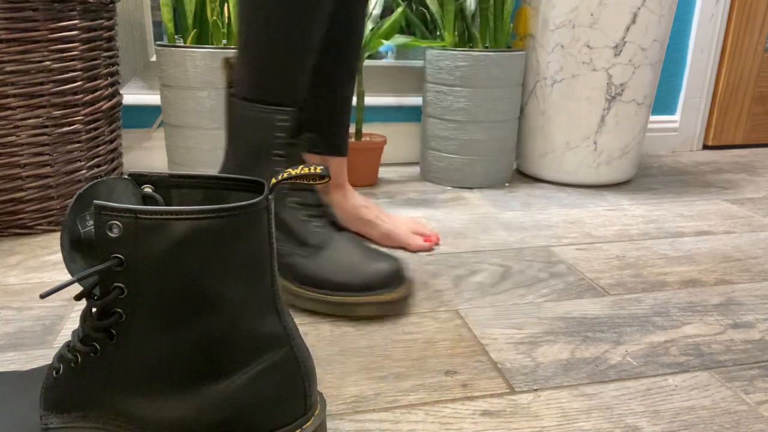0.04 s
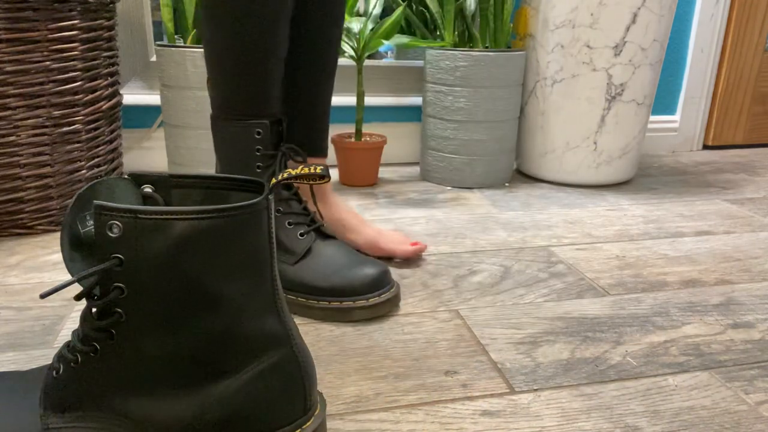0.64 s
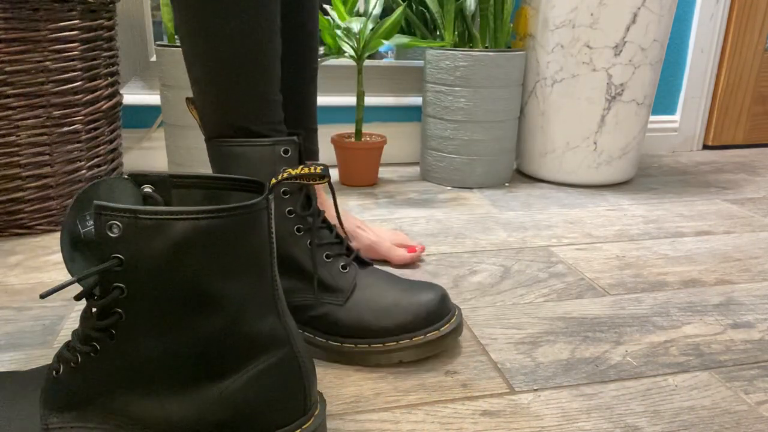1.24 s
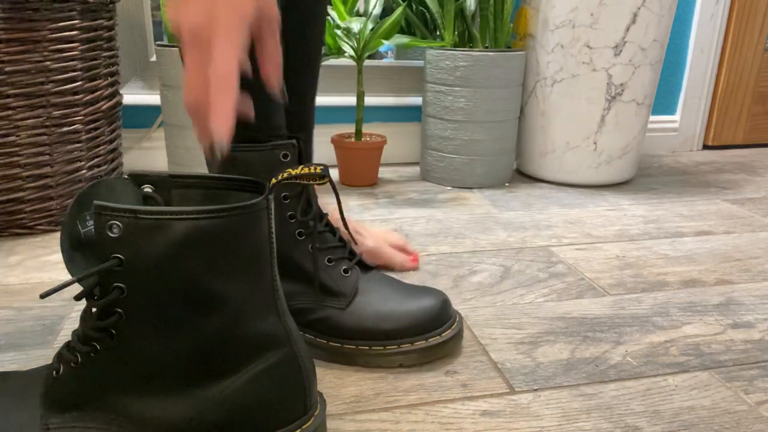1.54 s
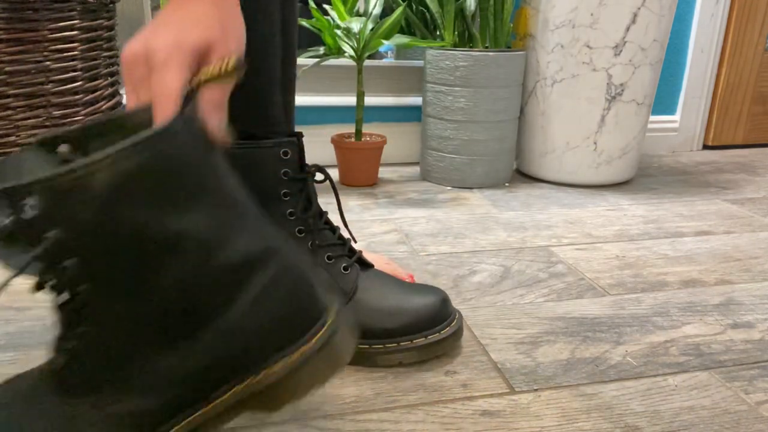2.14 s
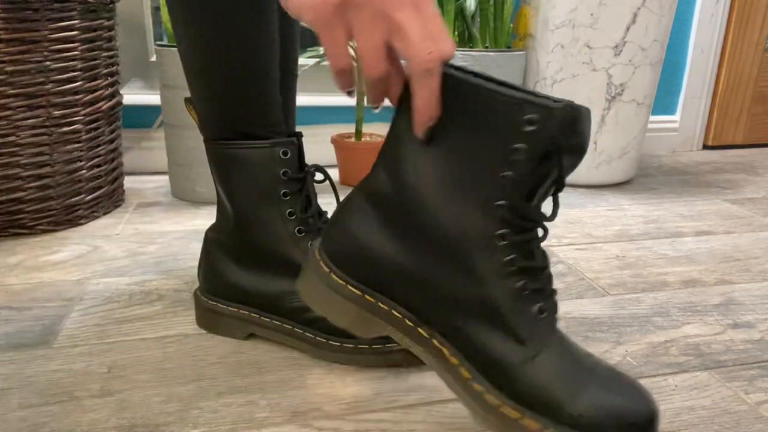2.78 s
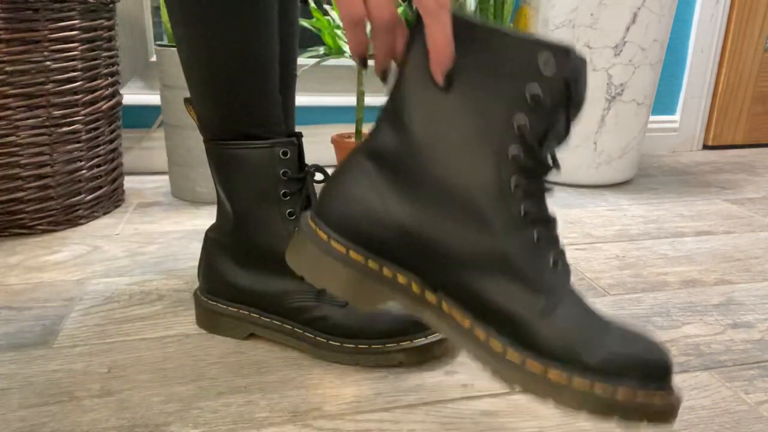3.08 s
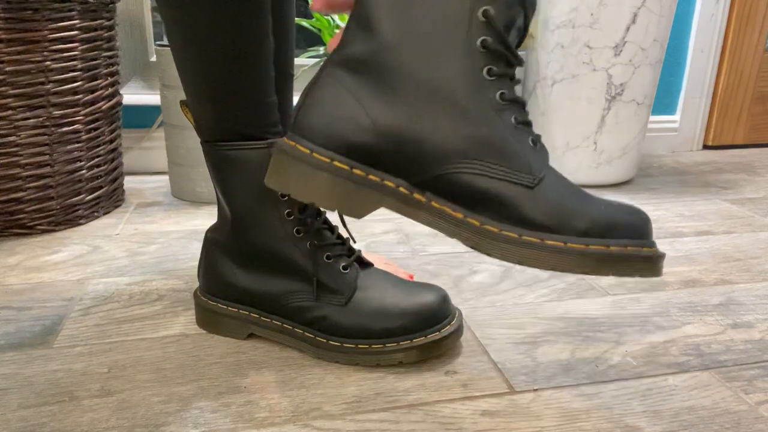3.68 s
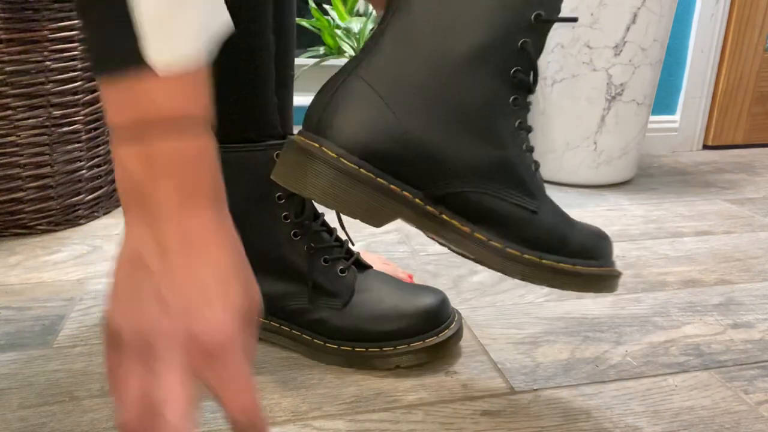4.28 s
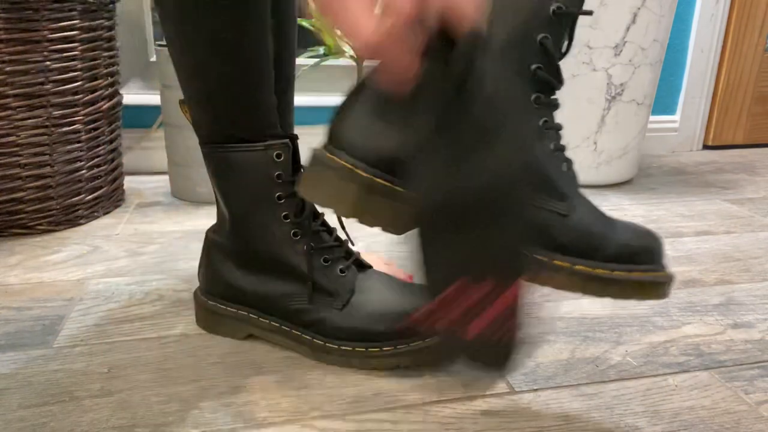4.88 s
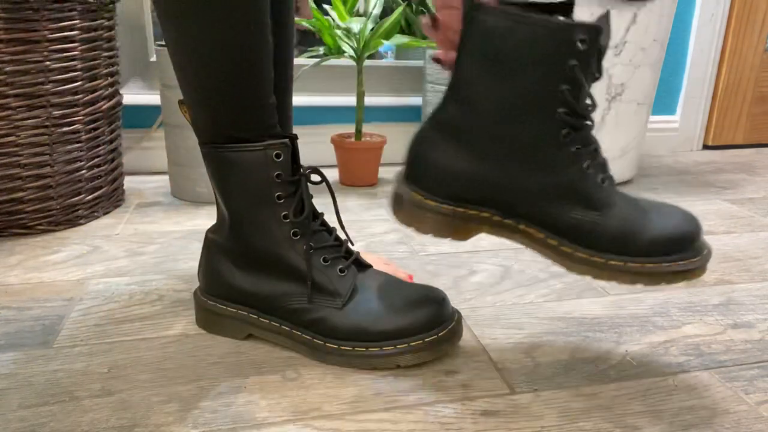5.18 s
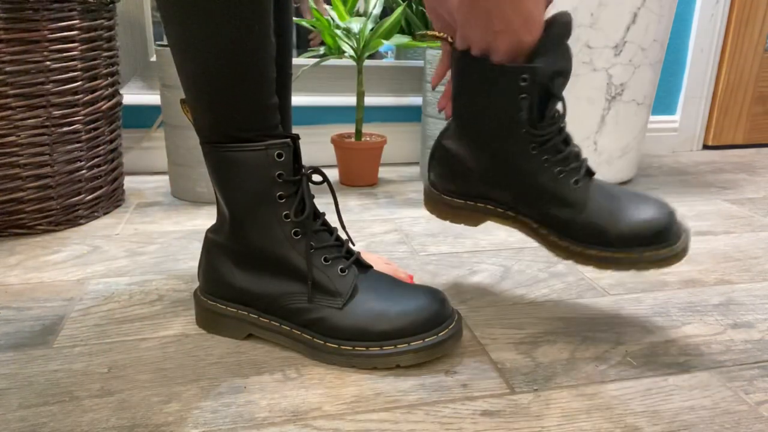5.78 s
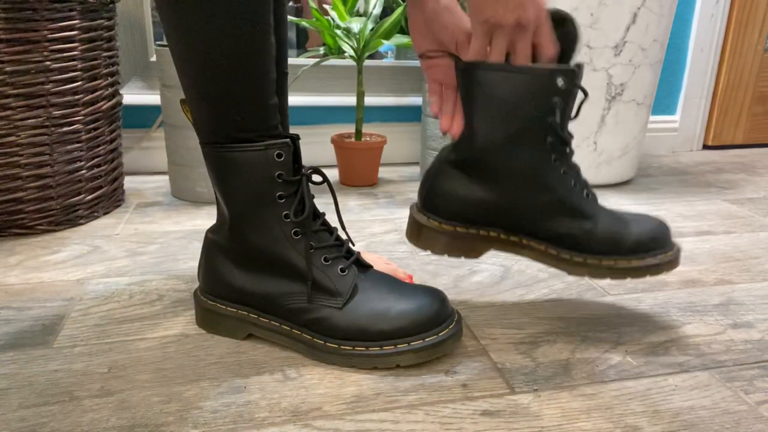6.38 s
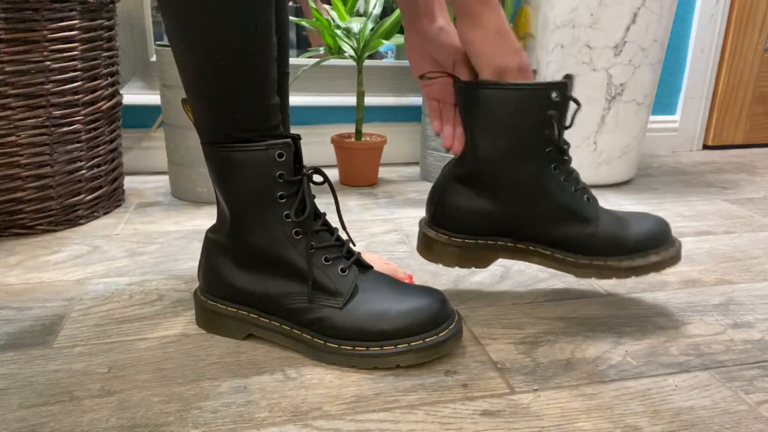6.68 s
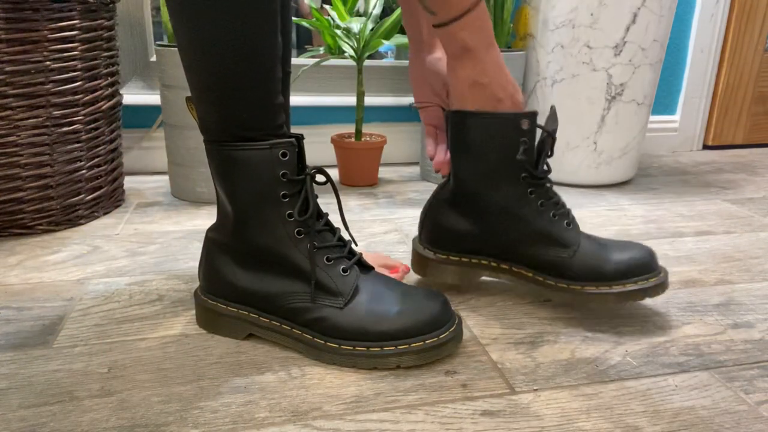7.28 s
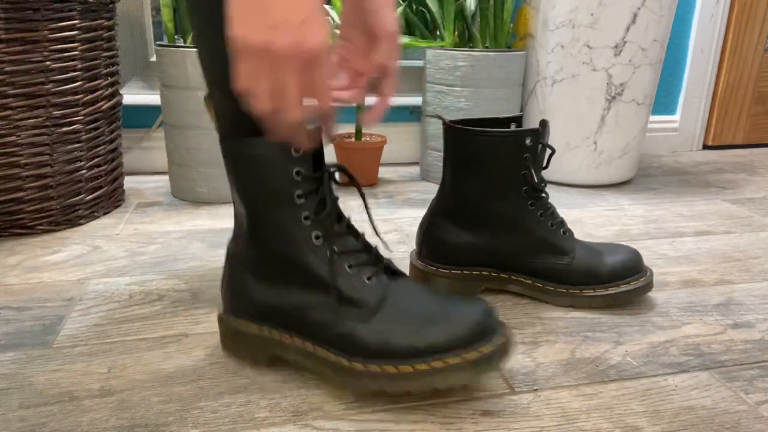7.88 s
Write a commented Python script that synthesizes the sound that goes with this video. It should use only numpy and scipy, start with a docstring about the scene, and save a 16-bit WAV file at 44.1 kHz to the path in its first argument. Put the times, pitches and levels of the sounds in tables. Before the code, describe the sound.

Stiff leather boots thump and scuff on a hard floor, creaking and rubbing as they are handled, with cloth swishes over a low room hum.

```python
"""Two stiff leather boots on a hard floor in a small room, close to a stereo pair of microphones.
First one boot is stepped into place: its rubber sole thumps and scuffs. Then a hand grips its mate and
swings it round; the shaft creaks, a sleeve passes, fingers pull the tongue open. Near the end the boot
is set down with a thump and the hand slides out. Throughout, cloth swishes and leather rubs as fast as
each movement goes, folds snap and lace tips tick, while the room rumbles and hums behind."""
import sys
import numpy as np
from scipy import signal
from scipy.fft import rfft, irfft, next_fast_len
from scipy.io import wavfile
from scipy.ndimage import uniform_filter1d, map_coordinates

SR = 44100
rng = np.random.default_rng(int(sys.argv[2]) if len(sys.argv) > 2 else 0)


def unload_audio(sound):
    """Save the sound as a 16-bit wav file, at the path given as the first command line argument."""
    columns = np.transpose(np.atleast_2d(sound))
    # keep every value between -1 and 1, then stretch to whole-number steps
    steps = np.round(np.clip(columns, -1, 1) * 32767)
    wavfile.write(sys.argv[1], SR, steps.astype(np.int16))


N = 349713
TIME = np.arange(N) / SR
BRIEF = TIME[:SR // 4]   # time within one short event

# sole meets floor: t/s, boot ring/dB, bending wave/dB, floor thud/dB, slap/dB, slap f/Hz, wave sweep/Hz
STEPS = [(0.118, -57, -32.5, -55, -56.5, 2530, 845), (0.1788, -51, -37.5, -33.5, -48.5, 895, 1000),
         (7.379, -27.5, -39.5, -37, -53.5, 1460, 770)]
# modes of the boot struck on its sole: f/Hz, level/dB, t60/s
BOOT_MODES = [(161, 7.5, 0.024), (222.5, 7.5, 0.026), (326, 8.5, 0.025), (568, -11.5, 0.054),
              (830, -52, 0.014)]
# the sole catches on the floor: t/s, level/dB
SCUFFS = [(0.1185, -54.5), (0.178, -63), (0.199, -57), (0.2145, -57.5), (1.107, -64), (1.1218, -47),
          (1.127, -62), (1.135, -66), (1.1402, -57), (1.143, -52), (1.1525, -55), (1.158, -64),
          (1.1712, -49.5), (1.179, -62), (1.184, -68), (1.193, -64), (1.206, -62), (1.2175, -63)]
# resonances of rubber on the hard floor: f/Hz, width/Hz, level/dB
SOLE_RING = [(1260, 280, 6), (2520, 540, -1.5), (4300, 990, -14.5)]
# movements of foot or hand: fastest t/s, rise/s, fall/s, cloth/dB, leather/dB, rasp/dB
STROKES = [ (0.0, .03, 0.038, -88, -72, -101), (0.13, 0.018, 0.035, -72.5, -68, -71),
           (0.2, 0.072, 0.14, -74.5, -72.5, -70), (0.38, 0.071, 0.16, -78, -90, -80),
           (0.801, 0.25, 0.11, -66, -74.5, -72), (0.95, 0.23, 0.068, -82, -76, -77.5),
           (1.019, 0.038, 0.074, -64.5, -72.5, -68.5), (1.147, 0.048, 0.12, -83, -64.5, -72),
           (1.39, 0.18, 0.046, -80.5, -94, -90), (1.48, 0.086, 0.18, -65, -78.5, -75),
           (1.681, 0.12, 0.24, -68, -76.5, -74.5), (2.07, 0.17, 0.15, -75, -77, -80.5),
           (2.452, 0.095, 0.11, -71, -67.5, -71.5), (2.606, 0.12, 0.06, -64, -71, -72.5),
           (3.1, 0.27, 0.23, -81.5, -94, -87.5), (3.3, 0.41, 1, -99, -82.5, -87),
           (3.585, 0.043, 0.08, -75, -71, -82), (3.63, 0.06, 0.1, -65.5, -73, -75),
           (3.72, 0.1, 0.16, -64.5, -64.5, -72.5), (3.9, 0.078, 0.12, -64.5, -68, -75),
           (4.23, 0.22, 0.1, -84, -100, -102), (4.43, 0.035, 0.12, -75, -81, -82.5),
           (4.65, 0.11, 0.14, -80, -99, -89), (4.77, 0.034, 0.088, -72, -104, -106),
           (5.24, 0.054, 0.13, -73, -79, -81.5), (5.36, 0.15, 0.19, -74.5, -75, -87),
           (5.64, 0.16, 0.21, -81, -79, -81.5), (5.82, 0.073, 0.11, -78, -74.5, -82.5),
           (5.985, 0.086, 0.091, -67.5, -67.5, -70), (6.045, 0.084, 0.091, -67.5, -67, -77),
           (6.12, 0.074, 0.082, -69, -69, -74.5), (6.34, 0.099, 0.17, -69.5, -72, -82),
           (6.51, 0.081, 0.084, -74, -73, -85), (6.61, 0.044, 0.077, -70.5, -72, -79),
           (6.72, 0.095, 0.12, -68.5, -72, -72.5), (6.82, 0.093, 0.081, -69.5, -73, -76),
           (6.9, 0.043, 0.06, -76, -80, -68), (6.98, 0.14, 0.2, -71.5, -73, -77.5),
           (7.095, 0.029, 0.05, -66.5, -67, -69), (7.31, 0.15, 0.072, -72, -74.5, -75),
           (7.384, 0.028, 0.049, -64.5, -64.5, -78), (7.56, 0.053, 0.068, -71.5, -74.5, -75),
           (7.66, 0.043, 0.15, -73.5, -72.5, -78.5), (7.77, 0.055, 0.036, -65.5, -68, -78),
           (7.83, 0.05, 0.06, -70.5, -77, -78.5), (7.915, 0.036, .1, -63, -60.5, -60)]
# low resonances of the leather upper: f/Hz, width/Hz, level/dB
LEATHER_BODY = [(810, 690, -2.5), (1394, 260, 5.5), (1920, 240, -9)]
# its high, rasping resonances: f/Hz, width/Hz, level/dB
LEATHER_RASP = [(2194, 360, 2), (3150, 280, 1.5), (3610, 610, -4), (4660, 1750, -8.5)]
# spectrum of sliding cloth: f/Hz, level/dB
CLOTH_SPECTRUM = [(500, 11), (1500, -18.5), (3000, -6.5), (4500, -6), (6000, -2.5), (8000, -2.5),
                  (10300, -1.5), (12500, -3.5), (15500, -7)]
# a hand or foot drags along the lining: fastest t/s, rise/s, fall/s, level/dB, f/Hz
DRAGS = [(0.18, 0.074, 0.1, -53.5, 463), (1.165, 0.075, 0.075, -59, 704), (1.7, 0.08, 0.47, -68.5, 490),
         (2.08, 0.099, 0.13, -62, 450), (2.5, 0.097, 0.1, -76, 413), (3.17, 0.085, 0.22, -71.5, 760),
         (3.72, 0.13, 0.12, -64, 850), (3.73, 0.095, 0.05, -57.5, 382), (5.33, 0.032, 0.47, -66.5, 420),
         (5.83, 0.039, 0.041, -59, 370), (5.97, 0.067, 0.42, -60, 376), (6.04, 0.11, 0.091, -79, 786),
         (6.72, 0.064, 0.065, -51.5, 476), (6.86, 0.22, 0.26, -64.5, 400), (7.11, 0.024, 0.066, -58, 430),
         (7.40, 0.13, 0.064, -56.5, 364), (7.57, 0.075, 0.27, -63.5, 443), (7.79, 0.17, 0.099, -67.5, 580),
         (7.92, 0.056, 0.11, -56, 560)]
# resonances of the air inside the shaft: f/Hz, width/Hz, level/dB
SHAFT_AIR = [(292, 59, 12.5), (457, 235, 3.5), (560, 51, 3), (815, 300, -20)]
# soft bumps of boot and hand: t/s, level/dB, f/Hz
BUMPS = [(0.131, -47, 600), (1.154, -56, 700), (1.483, -60, 720), (1.898, -52.5, 340), (1.910, -47, 343),
         (2.488, -51.5, 635), (3.894, -56, 560), (3.939, -58, 750), (5.542, -39.5, 140.3),
         (5.957, -52.5, 302), (6.617, -47, 320), (7.013, -52, 372), (7.091, -53, 338), (7.374, -49, 666),
         (7.443, -56, 510)]
# leather sticks and lets go with a snap: t/s, level/dB, f/Hz, width/Hz
SNAPS = [(0.132, -71, 2960, 800), (0.765, -60, 2200, 900), (1.481, -55.5, 1230, 1200),
         (1.65, -63.5, 965, 700), (1.895, -54.5, 3370, 800), (1.896, -60.5, 1300, 700),
         (2.486, -67, 1211, 894), (3.2359, -61, 1000, 590), (3.568, -63.5, 1400, 324),
         (3.899, -60, 2100, 1500), (3.91, -65, 1400, 1000), (3.94, -55, 1130, 600),
         (4.002, -60.5, 2100, 800), (5.067, -70, 1500, 700), (5.219, -62, 1200, 400),
         (5.621, -57.5, 1500, 604), (5.973, -59, 744, 295), (6.345, -65, 1430, 600),
         (6.471, -63, 1990, 1300), (7.011, -67, 1300, 706), (7.11, -58.5, 1120, 200),
         (7.473, -68, 1590, 400), (7.637, -62, 1290, 600)]
# slips of the bent shaft: t/s, level/dB
SHAFT_SLIPS = [(3.6875, -61), (3.692, -57), (3.6947, -46.5), (3.7025, -65), (3.707, -64), (3.7105, -57),
               (3.7143, -55), (3.7164, -46), (3.720, -51), (3.7285, -59), (3.7345, -61), (3.777, -64),
               (5.982, -62), (5.996, -58.5)]
# resonances of the taut fold that they ring: f/Hz, width/Hz, level/dB
FOLD_RING = [(1140, 220, -6.5), (1500, 116, 7.5), (1880, 190, 3), (3440, 580, -21)]
# lace tips and eyelets tick: t/s, level before trim/dB, f/Hz
TICKS = [(0.361, -69, 8100), (1.48, -56, 7500), (1.513, -53.5, 7100), (3.695, -52, 4990),
         (3.8587, -57, 7660), (3.894, -51.5, 8000), (4.476, -60, 8400), (5.065, -68.5, 6800),
         (5.441, -60, 9200), (5.543, -76, 6000), (5.6176, -48.5, 7100), (5.651, -60.5, 8600),
         (5.7046, -67, 4530), (6.0316, -60, 8070), (6.403, -56.5, 9700), (6.4684, -59, 6040),
         (7.5243, -61.5, 5600), (7.889, -45, 6640)]
# skin drags on leather and almost squeaks: fastest t/s, rise/s, fall/s, level/dB, f/Hz
SQUEAKS = [(3.61, 0.086, 0.19, -77, 1475), (6.335, 0.05, 0.06, -74, 1500), (7.77, 0.059, 0.11, -71, 1370)]
# skin whisks over the rim of the shaft: fastest t/s, rise/s, fall/s, level/dB, f/Hz
WHISKS = [(7.775, .035, 0.021, -65.5, 10900), (7.832, 0.044, 0.016, -66, 9050)]
# spectrum of the room's rumble: f/Hz, level/dB
RUMBLE_SPECTRUM = [(22, -32), (35, -13.5), (48, 0), (70, 4), (105, 2), (150, -4.5), (220, -4.5),
                   (290, -16.5), (350, -18.5), (450, -25), (620, -35.5), (900, -72), (1500, -65)]
# spectrum of the background hiss: f/Hz, level/dB
HISS_SPECTRUM = [(500, 4), (1000, 4), (1600, -0.5), (2800, -2), (4500, -11), (7000, -9.5), (10000, -9),
                 (15000, -20)]
# wavering hum of the room: f/Hz, width/Hz, level/dB
HUM = [(60.55, 22, -59), (77.6, 6.8, -58), (122.55, 5.27, -57), (201.2, 10, -66)]
# how wide the microphone pair hears: f/Hz, side gain/dB
STEREO_WIDTH = [(60, -14), (140, -18.5), (210, -8.5), (320, -4), (500, 3.5), (1700, 0), (3700, 2.5),
                (6000, 0.5), (8800, -33.5), (11000, -2.5), (13000, 6.5), (15500, 1)]

STROKE_EDGE_DB = 20.5   # drop from a movement's crest, one rise before it or one fall after
FLEX_GLIDE = 0.025   # share by which bending moves the pitch of the leather
CREAKS_PER_S, CREAK_DB = 54, -12   # level relative to the rubbing
CREAK_LOW_HZ, CREAK_HIGH_HZ, CREAK_WIDTH_HZ = 54 * 0 + 1000, 2590, 1100
CLOTH_PEAK_HZ, CLOTH_PEAK_WIDTH_HZ, CLOTH_PEAK_DB = 8380, 1400, -7
ROOM_T60_S, ROOM_DB = 0.18, -8
PAIR_LAG_S, LAG_SHARE, LAG_TOP_HZ = 0.00048, 0.2, 2460   # the right channel runs a little ahead of the left in the lows and mids
MID_CUTOFF_HZ, CUTOFF_HZ = 13000, 15700


def steps():
    """Rubber slaps the floor, the boot rings, and the floor answers with a falling chirp and a thud."""
    ring = sum(from_db(db) * np.sin(2 * np.pi * hz * BRIEF) * fade(t60) for hz, db, t60 in BOOT_MODES)
    ring = ring * (1 - fade(0.044))   # the sole takes a moment to compress
    thud_hz = 82
    thud = np.sin(2 * np.pi * thud_hz * BRIEF) * fade(0.073) * (1 - fade(0.24)) ** 2
    out = np.zeros(N)
    for s, *levels_db, slap_hz, sweep_hz in STEPS:
        bend_hz = 170 + sweep_hz * fade(0.015)   # short bending waves outrun long ones
        bend = np.sin(2 * np.pi * np.cumsum(bend_hz) / SR) * BRIEF * np.exp(-(BRIEF / 0.0072) ** 4)
        slap = resonate_twice(contact(t60=0.19, scatter=0.84), slap_hz, 830, 930)
        for db, part in zip(levels_db, (ring, bend, thud, slap)):
            add(out, s, from_db(db) * peak_one(part))
    return out


def scuffs():
    """Rubber grips and skips over the floor; each catch is a dry, gritty tick."""
    return catches(SCUFFS, SOLE_RING, t60=0.012, scatter=0.4, uneven_db=1.5)


def rubbing():
    """All that slides in front of the microphones, with its bounce off the floor."""
    s, rise_s, fall_s, *levels_db = np.transpose(STROKES)
    swish, rub, rasp = (sliding(zip(s, rise_s, fall_s, db)) for db in levels_db)
    return floor_echo(cloth(swish) + leather(rub, rasp) + lining() + squeaks() + whisks())


def leather(rub, rasp):
    """Coarse slips, coming in clumps, shake the leather upper."""
    slips = friction(per_s=650 * from_db(4.4 * drift(18)), spread_db=-6, hiss=0.85)
    low = rms_one(flexing_body(slips, LEATHER_BODY, flex_db=1.1))
    high = rms_one(flexing_body(slips, LEATHER_RASP, flex_db=1.3))
    return rub * (low + from_db(CREAK_DB) * creaks(patches=6)) + rasp * high


def flexing_body(x, resonances, flex_db):
    """As the leather bends, its resonances glide together and each swells and fades on its own."""
    swelling = [(hz, width, db + flex_db * drift(16)) for hz, width, db in resonances]
    return glide(body(x, swelling), FLEX_GLIDE, rate_hz=4)


def creaks(patches):
    """Small folds give way at random, each ringing one of several patches of leather; rms 1."""
    out = np.zeros(N)
    for hz in np.geomspace(CREAK_LOW_HZ, CREAK_HIGH_HZ, patches):
        slips = friction(per_s=CREAKS_PER_S / patches, spread_db=2, hiss=0)
        out += resonate_twice(slips, hz, CREAK_WIDTH_HZ, 2 * CREAK_WIDTH_HZ)
    return rms_one(out)


def cloth(strength):
    """Threads catch in clumps; as the fabric folds, lows and highs swell apart and a peak wanders."""
    threads = friction(per_s=2000 * from_db(5 * drift(20)), spread_db=1.8, hiss=0.45)
    weave = rms_one(colour(threads, CLOTH_SPECTRUM))
    lower = lowpass(weave, hz=7000, order=2)
    folded = lower * from_db(1.6 * drift(14)) + (weave - lower) * from_db(1.6 * drift(14))
    peak = rms_one(resonate(weave, CLOTH_PEAK_HZ, CLOTH_PEAK_WIDTH_HZ))
    peak = glide(peak, share=0.14, rate_hz=3)
    flicker = from_db(1.05 + 0.23 * drift(49))
    return rms_one(folded + from_db(CLOTH_PEAK_DB) * peak) * strength * flicker


def lining():
    """A hand or foot drags inside and stirs the boot's air; how it covers the opening sets the pitch."""
    air = body(friction(per_s=420, spread_db=0, hiss=0.28), SHAFT_AIR)
    return sum(stroke(*movement) * rms_one(resonate(air, hz, width_hz=305)) for *movement, hz in DRAGS)


def bumps():
    """Soft touches of boot and hand give a short, dull knock."""
    out = np.zeros(N)
    for s, db, hz in BUMPS:
        knock = resonate(contact(t60=0.05, scatter=0.9), hz, width_hz=0.4 * hz)
        cushion = signal.butter(2, 1.4 * hz, fs=SR, output="sos")
        add(out, s, from_db(db) * peak_one(signal.sosfilt(cushion, knock)))
    return out


def snaps():
    """A fold lets go: a crack with a few after-slips rings the patch of leather around it."""
    out = np.zeros(N)
    for s, db, hz, width_hz in SNAPS:
        crack = resonate_twice(contact(t60=0.022, scatter=0.75), hz, width_hz, 2 * width_hz)
        add(out, s, from_db(db) * peak_one(crack))
    return out


def shaft_creak():
    """A taut fold of the shaft sticks and slips in a short, dry rasp."""
    return catches(SHAFT_SLIPS, FOLD_RING, t60=0.012, scatter=0.3, uneven_db=1.1)


def lace_ticks(trim_db=-4):
    """Hard lace tips and eyelets touch with a brief, bright click."""
    out = np.zeros(N)
    for s, db, hz in TICKS:
        click = resonate_twice(contact(t60=0.022, scatter=2.2), hz, 7200, 9000)
        add(out, s, from_db(db + trim_db) * peak_one(click))
    return out


def squeaks():
    """Skin sticks and slips, locking loosely onto one resonance of the leather."""
    tones = sum(stroke(*movement) * wavering(hz, width_hz=150) for *movement, hz in SQUEAKS)
    return tones * from_db(2.5 * drift(25))


def whisks():
    """Quick, light strokes of skin over the rim give a thin, high hiss."""
    slips = friction(per_s=3000, spread_db=4, hiss=0.4)
    return sum(stroke(*movement) * rms_one(resonate_twice(slips, hz, 3500, 5000))
               for *movement, hz in WHISKS)


def floor_echo(x, share=0.28):
    """The path to the microphones by way of the floor changes as the hands move, so notches glide."""
    delay_s = 0.0014 * from_db(2.5 * drift(1.2))
    return (x + share * delayed(x, delay_s)) / np.hypot(1, share)


def walls(x):
    """The walls of the small room return a duller tail."""
    tail = reflections(x, ROOM_T60_S, delay_s=0.00602)
    return from_db(ROOM_DB) * resonate(tail, hz=1200, width_hz=4000)


def room_tone():
    """The place itself: low rumble, a few wavering hum tones and faint hiss."""
    rumble = from_db(-50.5) * rms_one(colour(rng.standard_normal(N), RUMBLE_SPECTRUM))
    hiss = from_db(-81) * rms_one(colour(rng.standard_normal(N), HISS_SPECTRUM))
    return rumble + hiss + sum(from_db(db) * wavering(hz, width_hz) for hz, width_hz, db in HUM)


def right_lead(x):
    """Side signal that puts the right channel a little ahead of the left in the lows and mids."""
    low = lowpass(x, LAG_TOP_HZ, order=1)
    return LAG_SHARE * (delayed(low, PAIR_LAG_S / 2) - delayed(low, -PAIR_LAG_S / 2)) / 2


def stroke(s, rise_s, fall_s, db):
    """A movement speeds up and comes to rest in a bell curve; its strength follows the speed."""
    out = np.zeros(N)
    during = slice(*np.searchsorted(TIME, [s - 2 * rise_s, s + 2 * fall_s]))
    since = TIME[during] - s
    away = since / np.where(since < 0, rise_s, fall_s)
    out[during] = from_db(db - STROKE_EDGE_DB * away ** 2)
    return out


def sliding(movements):
    """Strength of a run of movements; where they overlap their powers add."""
    return np.sqrt(sum(stroke(*movement) ** 2 for movement in movements))


def friction(per_s, spread_db, hiss):
    """Fibres catch and slip at random: grains of uneven size on an even hiss."""
    sizes = from_db(spread_db * np.minimum(rng.exponential(1, N), 4)) * rng.choice([-1, 1], N)
    grains = sizes * (rng.random(N) < per_s / SR)
    return rms_one(rms_one(grains) + hiss * rng.standard_normal(N))


def catches(rows, resonances, t60, scatter, uneven_db):
    """Each catch lets go with a crack and some grit, and rings the resonances in its own balance."""
    out = np.zeros(N)
    for s, peak_db in rows:
        ring = [(hz, width, db + uneven_db * rng.standard_normal()) for hz, width, db in resonances]
        add(out, s, from_db(peak_db) * peak_one(body(contact(t60, scatter), ring)))
    return out


def contact(t60, scatter):
    """One clean impulse followed by a dying spray of tiny slips."""
    spray = rng.standard_normal(len(BRIEF)) * fade(t60)
    return (BRIEF == 0) + scatter * spray / np.linalg.norm(spray)


def reflections(x, t60, delay_s):
    """A dense, dying cloud of echoes that carries as much energy as the sound itself."""
    echoes = rng.standard_normal(len(BRIEF)) * fade(t60) * (BRIEF >= delay_s)
    return signal.oaconvolve(x, echoes / np.linalg.norm(echoes))[:N]


def wavering(hz, width_hz):
    """A narrow band of sound whose strength and phase wander; rms 1."""
    carrier = np.exp(2j * np.pi * hz * TIME)
    wander = drift(width_hz / 2) + 1j * drift(width_hz / 2)
    return rms_one(np.real(wander * carrier))


def drift(rate_hz):
    """Slow random wander with rms 1."""
    hop, settle = 40, 2000
    pole = np.exp(-2 * np.pi * rate_hz * hop / SR)
    noise = rng.standard_normal(N // hop + settle + 2)
    slow = signal.lfilter([1], [1, -2 * pole, pole * pole], noise)[settle:]
    return np.interp(np.arange(N) / hop, np.arange(len(slow)), rms_one(slow))


def glide(x, share, rate_hz):
    """Let the pitch wander by reading the sound at a drifting speed."""
    position = np.cumsum(1 + share * drift(rate_hz))
    return map_coordinates(x, [position], order=3, mode="mirror")


def body(x, resonances):
    """Resonances in parallel, signs alternating."""
    return sum((-1) ** k * from_db(db) * resonate(x, hz, width)
               for k, (hz, width, db) in enumerate(resonances))


def resonate(x, hz, width_hz):
    """One resonance with gain 1 on top."""
    r = np.exp(-np.pi * width_hz / SR)
    feedback = [1, -2 * r * np.cos(2 * np.pi * hz / SR), r * r]
    return signal.lfilter(np.array([1, 0, -1]) * (1 - r * r) / 2, feedback, x + 1e-18)


def resonate_twice(x, hz, first_width_hz, second_width_hz):
    """Two resonances in series at one pitch, for steeper skirts."""
    return resonate(resonate(x, hz, first_width_hz), hz, second_width_hz)


def colour(x, spectrum):
    """Give a signal a smooth spectrum."""
    hz, db = np.transpose(spectrum)
    size = next_fast_len(N)
    bins_hz = np.maximum(np.arange(size // 2 + 1) * SR / size, 1)
    gain = from_db(np.interp(np.log(bins_hz), np.log(hz), db))
    return irfft(rfft(x, size) * gain, size)[:N]


def lowpass(x, hz, order):
    """Roll off the treble forwards and backwards, so nothing is delayed."""
    return signal.sosfiltfilt(signal.butter(order, hz, fs=SR, output="sos"), x)


def delayed(x, s):
    """The sound s seconds later."""
    return np.interp(TIME - s, TIME, x)


def fade(t60):
    """Exponential decay over one event."""
    return np.exp(-np.log(1000) * BRIEF / t60)


def add(track, s, sound):
    """Mix a sound in at a time."""
    at = max(round(s * SR), 0)
    track[at:at + len(sound)] += sound[:N - at]


def from_db(db):
    """Decibels to gain."""
    return 10 ** (np.asarray(db) / 20)


def rms_one(x):
    """Scale to rms 1."""
    return x / np.sqrt(np.mean(x ** 2) + 1e-20)


def peak_one(x):
    """Scale so that the loudest two milliseconds have rms 1."""
    return x / np.sqrt(uniform_filter1d(x ** 2, SR // 500).max() + 1e-20)


def scene():
    """The boots lie close ahead of the pair; wide rubbing surfaces and near echoes spread the image."""
    blows = steps() + bumps() + snaps() + scuffs() + shaft_creak() + lace_ticks()
    rubs, edge_rubs = rubbing(), rubbing()   # middle and edges: same movements, slips of their own
    boots = blows + rubs
    soften = signal.ellip(8, 0.1, 70, MID_CUTOFF_HZ, fs=SR, output="sos")
    mid = blows + signal.sosfilt(soften, rubs + walls(boots) + room_tone())
    # off the floor and nearby pots
    near_echoes = from_db(-3.5) * reflections(0.6 * blows + rubs, t60=0.045, delay_s=0.0008)
    diffuse = near_echoes + from_db(-7) * edge_rubs + walls(boots) + room_tone()
    side = colour(diffuse, STEREO_WIDTH) + right_lead(boots)
    side += 0.098 * lowpass(mid, hz=400, order=1)   # the bass leans to the left
    return np.array([mid + side, mid - side])


def record(dry):
    """Both microphone channels lose their very top to a steep cut."""
    return signal.sosfilt(signal.ellip(10, 0.1, 80, CUTOFF_HZ, fs=SR, output="sos"), dry)


dry = scene()
out = record(dry)
unload_audio(out)
```